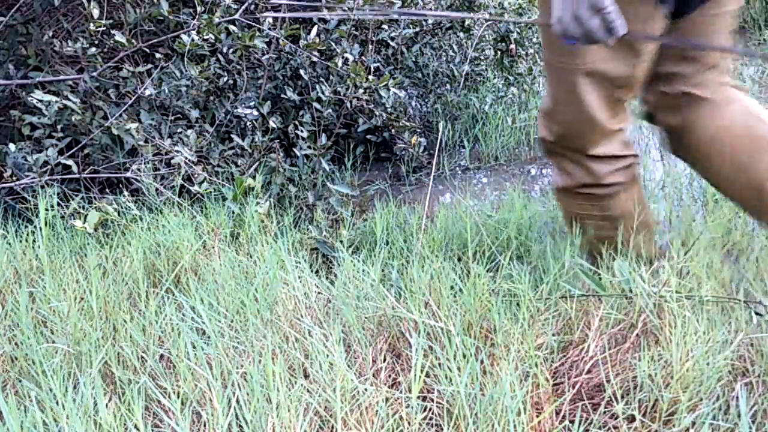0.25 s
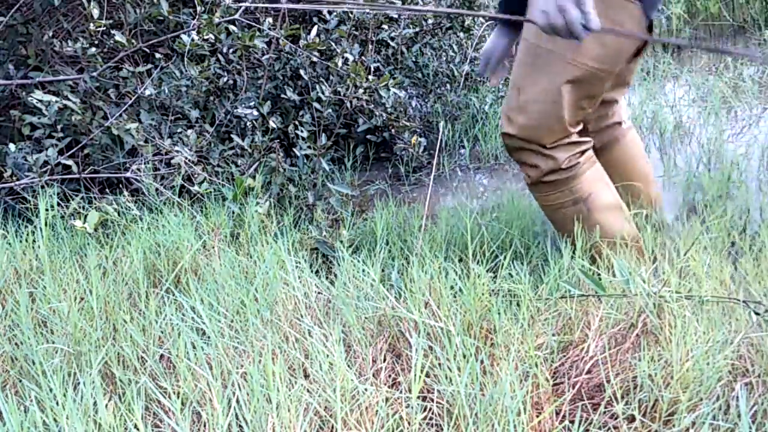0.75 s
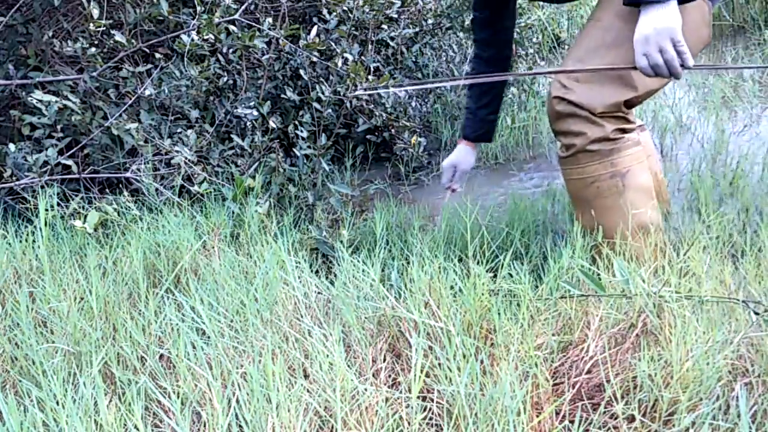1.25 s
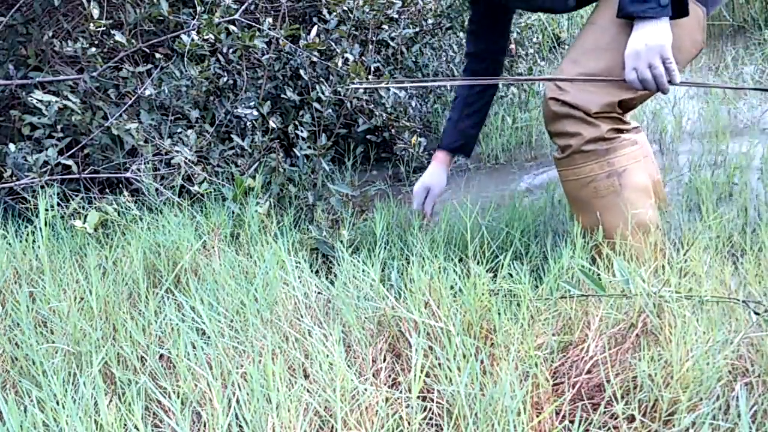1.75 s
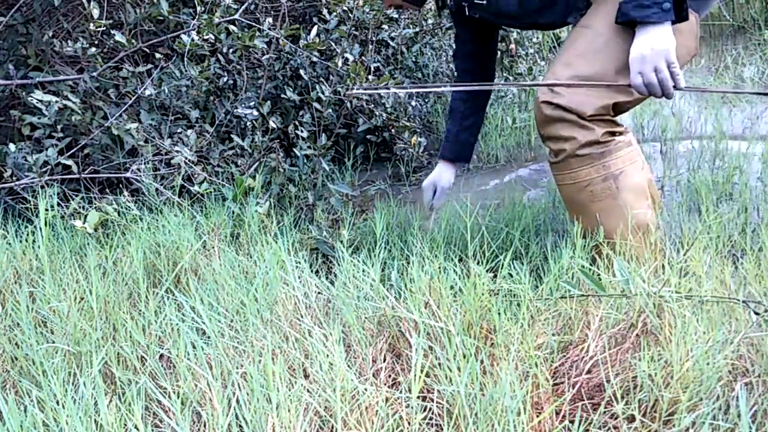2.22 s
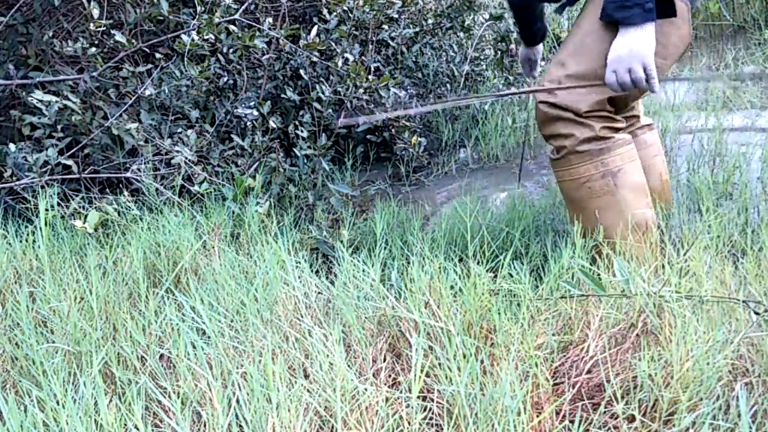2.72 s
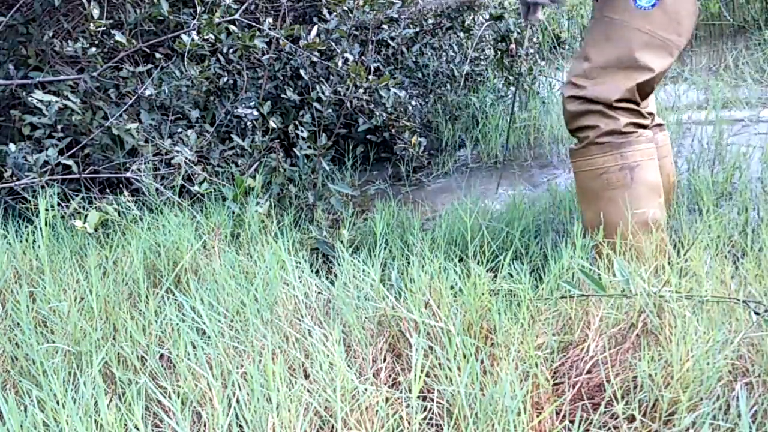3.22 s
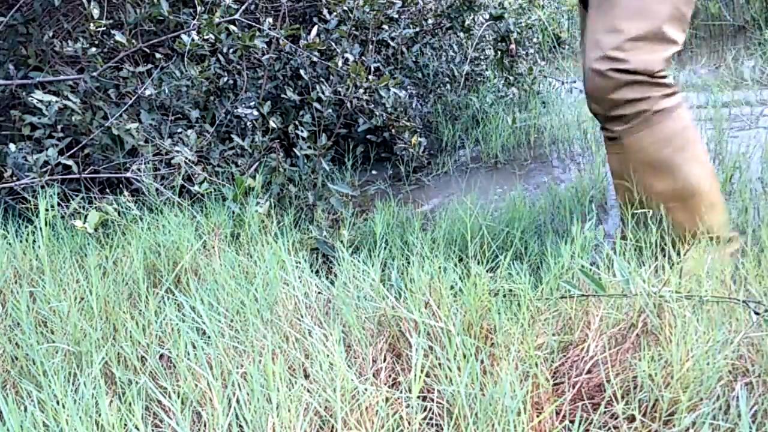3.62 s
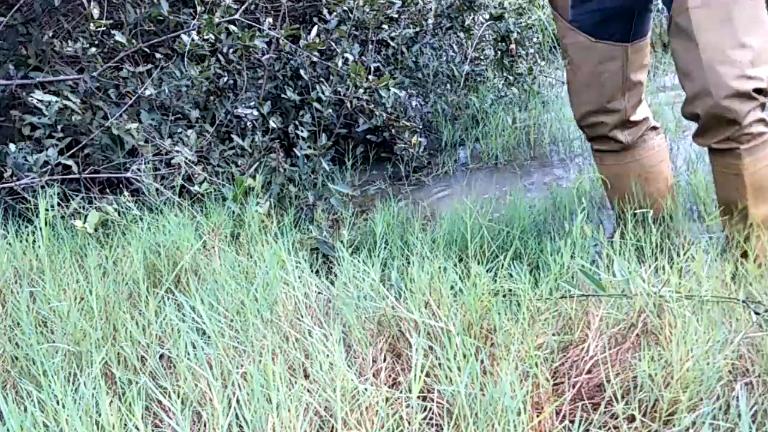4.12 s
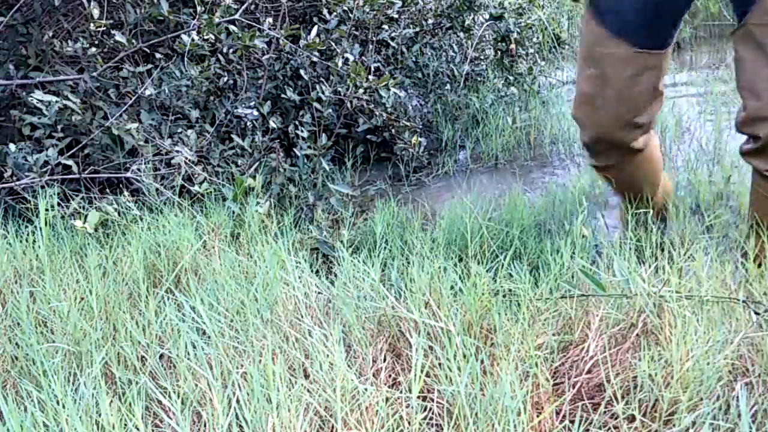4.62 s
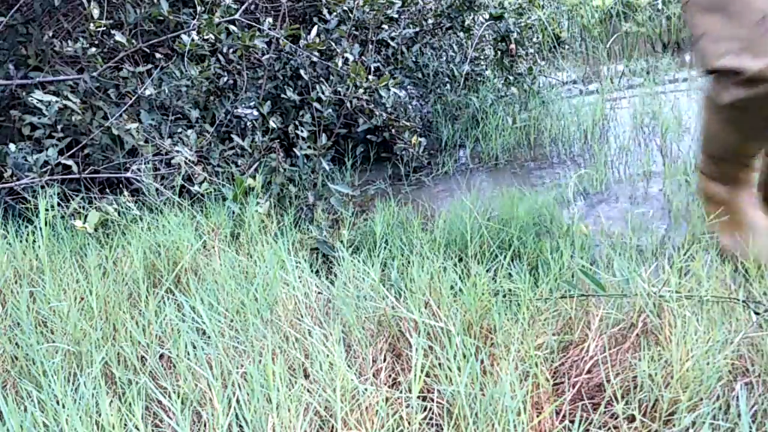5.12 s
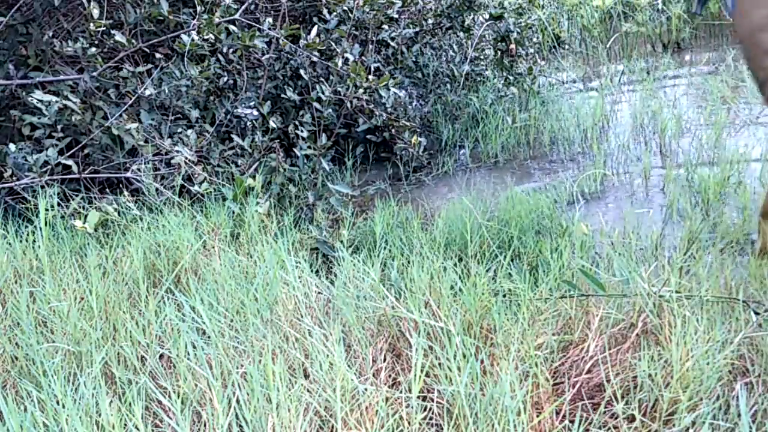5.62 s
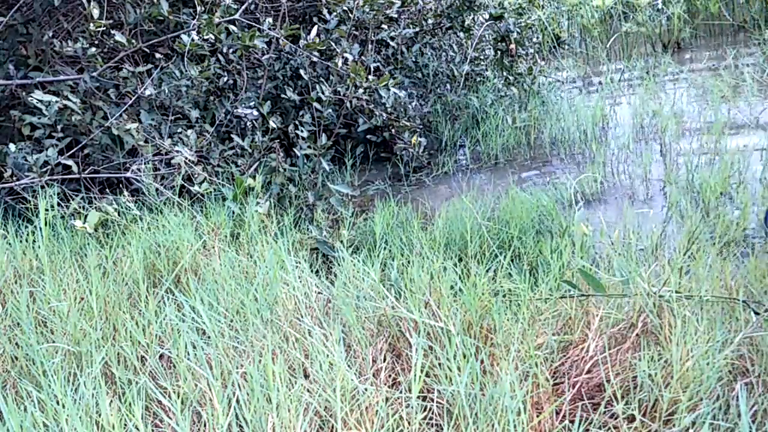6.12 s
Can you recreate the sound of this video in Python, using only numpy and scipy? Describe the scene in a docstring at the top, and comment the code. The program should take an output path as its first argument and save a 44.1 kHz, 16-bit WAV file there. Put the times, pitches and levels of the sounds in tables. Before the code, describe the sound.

Someone wades along a grassy pond edge, sloshing, dripping and snapping stems, over a faint bird, crickets and a low far-off rumble.

```python
"""Wet grass swishes and stems snap as someone in rubber waders steps along a pond edge, right of centre.
Blades slide on rubber, the shallows slosh and froth, and drops pat on the surface and plop as bubbles
ring with a rising pitch. Behind the steps a small bird repeats falling notes, two crickets trill with
their wings, and distant traffic lays a low rumble under it all."""
import sys
import numpy as np
from scipy import signal
from scipy.fft import rfft, irfft, next_fast_len
from scipy.io import wavfile

SR = 44100
rng = np.random.default_rng(int(sys.argv[2]) if len(sys.argv) > 2 else 0)


def pcm_store(signal):
    """Save signal as 16-bit PCM."""
    levels = np.round(np.clip(np.atleast_2d(signal), -1, 1) * 32767)
    wavfile.write(sys.argv[1], SR, levels.astype(np.int16).T)


N = 280299
T = np.arange(N) / SR

# water and grass stirring between sweeps: (time [s], slosh [dB], rustle [dB], spray [dB], froth [dB])
STIR = [(0, -55.5, -63.5, -65.5, -65.5), (.42, -57.5, -54, -68.5, -63), (.59, -62.5, -64.5, -80, -63),
        (.7, -57.5, -58, -85, -56), (.95, -61.5, -59, -81, -67), (1.22, -64.5, -62, -75.5, -68),
        (1.32, -71, -68, -83, -91), (1.8, -70.5, -79, -88, -78), (2.6, -78.5, -104, -113, -85),
        (2.85, -70, -72.5, -86.5, -72.5), (3.12, -73, -65, -99, -61), (3.42, -68.5, -72, -110, -83),
        (3.85, -65.5, -63, -104, -69.5), (4.1, -72, -67.5, -99, -67), (4.35, -79, -81, -116, -105),
        (4.75, -76, -80, -116, -80), (4.82, -61.5, -62, -96, -82), (5.0, -60, -61, -88, -73),
        (5.2, -70, -63, -83.5, -79), (5.5, -56.5, -63.5, -67, -69), (5.78, -65, -70.5, -79.5, -73),
        (5.92, -64.5, -76, -92, -73.5), (6.36, -65.5, -76, -105, -68.5)]
# boot sweeps through wet grass: (start [s], rise [s], hold [s], rustle [dB], spray [dB], froth [dB])
SWEEPS = [(0.075, 0.014, 0.052, -49, -62, -73), (0.167, 0.048, 0.026, -55, -85, -56.5),
          (0.296, 0.0096, 0.03, -43, -64, -46.5), (0.612, 0.0096, 0.044, -47.5, -62, -62),
          (0.685, 0.015, 0.014, -51.5, -61, -53), (0.744, 0.013, 0.0063, -45.5, -63, -66),
          (0.835, 0.0081, 0.0059, -45.5, -54.5, -81), (0.863, 0.01, 0.01, -74, -90, -88),
          (2.624, 0.072, 0.068, -61, -81.5, -66), (3.82, 0.042, 0.09, -69, -76, -75),
          (4.776, 0.021, 0.11, -57, -94, -48.5), (4.924, 0.032, 0.08, -57.5, -68, -46),
          (5.018, 0.05, 0.049, -53.5, -62.5, -65), (5.519, 0.06, 0.044, -51.5, -64, -82)]
RUSTLE, SPRAY, FROTH = range(3)   # the layers of a sweep
# tone of pushed water, sliding blades, fine spray and far air: (frequency [Hz], relative level [dB])
SLOSH_SPECTRUM = [(88, -35), (150, 8), (200, -4), (371, -3), (833, -7.5), (1500, -18.5), (1950, -44),
                  (3300, -120)]
RUSTLE_SPECTRUM = [(590, -5.5), (1000, -13), (1420, 0.5), (1640, 3.5), (3660, 9), (5260, -9.5), (7500, -34),
                   (9750, -51), (16500, -120)]
SPRAY_SPECTRUM = [(3820, -6), (6500, -5), (8550, -12), (9720, -15), (12500, -18), (13800, -14.5),
                  (15600, -17.5)]
AIR_SPECTRUM = [(15, -26), (40, -6.5), (100, -4.5), (170, -5.5), (300, -18), (800, -23), (2500, -26),
                (3200, -25.5), (3500, -57), (3900, -19.5), (4600, -37), (5100, -71), (8000, -73),
                (16000, -105)]
# how much later the steps reach the left channel: (time [s], lag [microseconds])
WALKER_LAG = [(0, 149), (1.3, 146), (2.5, 54), (4.3, 152), (4.7, 142), (5.2, 131), (5.45, 246), (6.36, 243)]
# stereo likeness of the far bed: (frequency [Hz], left-right correlation [0-1])
FAR_LIKENESS = [(30, 0.73), (100, 1), (300, 0.28), (600, 0.063), (3000, 0.062)]
# level ride of the rumble: (time [s], relative level [dB])
RUMBLE_RIDE = [(0.0, -61), (0.21, -55), (4.07, -57.5), (4.74, -62.5), (4.83, -58), (6.36, -56)]
# noise bands of the rumble: (centre [Hz], width [Hz], relative level [dB])
RUMBLE_BANDS = [(81.7, 46, -3.5), (102.1, 9.3, -1.5), (120.4, 28.5, -1.5), (140.5, 37, -12)]
# bird phrases: (middle of first note [s], notes [count], first note [dB], later notes [dB])
BIRD_PHRASES = [(0.041, 1, -59.5, -64), (.43, 1, -58, -61), (1.19, 2, -59.5, -60), (1.519, 3, -66.5, -58),
                (1.808, 2, -72, -72), (2.216, 3, -61, -61), (2.84, 1, -58, -57), (3.191, 2, -59, -58.5),
                (3.508, 3, -69, -59), (3.976, 2, -60.5, -59.5), (4.295, 3, -67, -61),
                (5.391, 2, -60.5, -59.5), (5.792, 1, -73, -70), (5.964, 3, -60, -59.5)]
# the fall of each bird note: (start pitch [Hz], end pitch [Hz], length [s])
BIRD_GLIDE = (3220, 2740, 0.039)
# longer far notes: (middle [s], level [dB], start pitch [Hz], end pitch [Hz], length [s])
FAR_WHISTLES = [(3.544, -67.5, 1890, 1888, 0.21), (5.29, -69, 2220, 2160, 0.13),
                (6.197, -68.5, 2630, 1774, 0.18)]
# stems breaking under a boot, and near 5.6 s a few sharp clicks of drops hitting the water: (time [s], relative
# crack level [dB], relative thud level [dB], pitch [Hz])
SNAPS = [(0.0956, -36.5, -47, 1030), (0.2733, -36.5, -40, 1000), (0.3162, -37, -33, 1610),
         (0.6199, -32, -60, 2470), (0.6962, -39, -39.5, 1500), (0.703, -39, -44, 1220),
         (0.711, -49, -45, 2300), (0.727, -31.5, -56, 1820), (0.7572, -26, -31.5, 1550),
         (0.845, -16, -35.5, 1184), (1.2075, -55, -52.5, 1800), (5.588, -40.5, -57, 3280),
         (5.6164, -44, -69, 3650), (5.632, -36.5, -66, 3000)]
# flying droplets: (time [s], relative level [dB], pitch [Hz])
DROPLET_TICKS = [(0.302, -45, 4170), (.319, -32, 2680), (.333, -42, 3600), (0.4736, -42, 4330),
                 (.594, -45, 3020), (.626, -46, 5040), (.6335, -34, 4100), (.698, -35, 4200),
                 (0.708, -48.5, 6400), (0.755, -43.5, 5500), (.764, -47, 5600), (0.85, -46.5, 5550),
                 (0.855, -60, 7450), (1.619, -48, 6450), (4.2766, -49, 3870), (4.817, -35.5, 3800)]
# drops and air pockets closing: (time [s], relative level [dB], nominal pitch [Hz], 60 dB decay [s])
PLOPS = [(0.197, -39, 1300, 0.024), (0.308, -40.5, 1520, 0.052), (0.347, -36, 1610, 0.01),
         (0.364, -46.5, 943, 0.053), (0.461, -41, 1285, 0.024), (0.51, -50.5, 1940, 0.023),
         (.527, -53, 706, 0.064), (0.366, -45, 2390, .03), (0.5738, -37, 2530, 0.021),
         (.575, -41, 1930, 0.022), (0.6338, -24.5, 2650, 0.0057), (0.7, -34.5, 1150, 0.036),
         (0.751, -24, 2050, 0.0095), (0.8776, -30.5, 1740, 0.012), (0.9485, -40.5, 2690, 0.035),
         (0.968, -41, 1810, 0.021), (0.996, -44, 2070, 0.032), (1.1773, -40.5, 1745, 0.023),
         (2.6457, -42.5, 1740, 0.017), (2.671, -36, 755, 0.016), (2.722, -45.5, 2470, 0.028),
         (2.726, -46, 1730, 0.025), (2.753, -42, 2770, 0.043), (2.768, -48, 2240, 0.037),
         (2.9, -42.5, 1640, 0.037), (2.899, -44.5, 1062, 0.049), (2.985, -53, 1500, .02),
         (3.014, -48, 1830, .02), (3.06, -42, 1520, 0.022), (3.091, -50.5, 1550, 0.041),
         (3.11, -54, 2580, 0.03), (3.118, -48.5, 3220, 0.03), (3.129, -47, 880, 0.017),
         (3.132, -48.5, 1630, 0.032), (3.1389, -40.5, 1810, 0.014), (3.219, -47, 1200, 0.024),
         (3.293, -38.5, 1044, 0.036), (3.394, -52, 1915, 0.023), (3.7947, -39.5, 1290, 0.016),
         (3.82, -59, 2050, 0.018), (3.837, -54, 1700, 0.016), (3.85, -51, 1700, 0.033),
         (3.907, -50, 2160, 0.021), (4, -52, 1530, 0.02), (4.021, -47.5, 800, 0.036),
         (4.035, -51, 1420, 0.018), (4.152, -54, 1520, 0.019), (4.075, -41, 792, 0.024),
         (4.277, -52.5, 1760, 0.025), (4.403, -58, 1745, 0.035), (4.774, -38.5, 1930, 0.024),
         (4.796, -28.5, 1755, 0.021), (4.803, -39, 785, 0.023), (4.847, -39, 1046, .03),
         (4.852, -27, 678, 0.032), (4.9435, -36, 740, 0.026), (4.974, -35.5, 1720, 0.029),
         (4.978, -34.5, 1093, 0.045), (5.001, -24.5, 1840, 0.014), (5.027, -37, 1320, 0.022),
         (5.0623, -35.5, 1290, 0.019), (5.0883, -48, 2900, 0.014), (5.108, -48, 1360, 0.019),
         (5.255, -50, 1250, 0.018), (5.3217, -51.5, 1750, 0.027), (6.231, -52, 706, 0.026),
         (6.268, -48, 1390, 0.016), (6.332, -38.5, 833, 0.027)]
# water closing over a boot: (time [s], level [dB], start pitch [Hz], 60 dB decay [s], pitch climb [1/s])
GURGLES = [(.97, -51.5, 904, 0.28, 6), (1.04, -52, 506, 0.21, 8.5), (2.68, -49, 671, 0.12, 1.5),
           (2.728, -38, 806, 0.11, 40.5), (2.742, -46, 680, 0.081, 15.5), (2.832, -51, 950, 0.05, 53),
           (2.932, -55, 895, 0.08, 3.5), (3.015, -49, 944, 0.12, 2), (3.885, -29.5, 1075, 0.044, 41.5),
           (3.89, -46.5, 582, 0.13, 3.5), (4.076, -42.5, 1060, 0.043, 23), (4.295, -54.5, 1090, 0.14, -2),
           (4.868, -37, 745, 0.2, 5.5), (4.875, -34, 894, 0.12, 6), (4.94, -42, 410, 0.29, 9.5),
           (4.955, -42, 815, 0.068, 6), (4.996, -36, 501, 0.2, 9), (5.03, -34, 1213, 0.059, 7),
           (6.335, -44, 843, 0.15, 4.5)]
# pace of the near cricket: (time [s], trills so far [count])
CRICKET_PACE = [(.74, 0), (2.198, 6), (3.42, 11), (4.181, 14), (6.335, 23)]
# level ride of the near cricket: (time [s], level [dB])
CRICKET_RIDE = [(.7, -66), (1.7, -66.5), (2.2, -71.5), (2.7, -65.5), (4.2, -66), (4.5, -75), (4.9, -71),
                (5.6, -68.5), (6.3, -72)]
# trills of a higher, farther cricket: (time [s])
HIGH_TRILLS = [1.28, 1.58, 1.9, 2.21, 2.68, 3.0, 3.32, 3.75, 4.16, 4.47]
# drops striking the surface: (time [s], level [dB], pitch [Hz])
PATS = [(2.746, -30, 2400), (2.8987, -29.5, 1590), (3.0148, -48, 2100), (3.048, -33, 2000),
        (3.1356, -37, 2500), (3.1403, -38, 1900), (3.797, -39.5, 1800), (4.7742, -39, 2500),
        (4.888, -24, 2700), (4.9662, -22.5, 2500), (5.002, -30, 2590), (5.027, -29, 2200),
        (5.063, -25, 2000), (5.1118, -33, 2000)]


def amp(db):
    """Decibels to gain."""
    return 10 ** (np.asarray(db) / 20)


def rms_one(x):
    """Scale to unit rms."""
    return x / np.sqrt(np.mean(x ** 2) + 1e-20)


def at_hz(points, hz):
    """Read a curve on a log-frequency axis."""
    knots_hz, values = np.transpose(points)
    return np.interp(np.log(hz + 1), np.log(knots_hz), values)


def colour(x, spectrum):
    """Equalise to a spectrum, at unit rms."""
    size = next_fast_len(N)
    gain = amp(at_hz(spectrum, np.arange(size // 2 + 1) * SR / size))
    return rms_one(irfft(rfft(x, size) * gain, size)[..., :N])


def band(x, low_hz, high_hz):
    """Band-pass, at unit rms."""
    return rms_one(signal.sosfilt(signal.butter(2, [low_hz, high_hz], "band", fs=SR, output="sos"), x))


def drift(rate_hz):
    """A random wander, at unit rms."""
    knots = np.arange(0, T[-1] + 1, .5 / rate_hz)
    return rms_one(np.interp(T, knots, rng.standard_normal(len(knots))))


def add(out, s, sound):
    """Mix a short sound in at time s."""
    i = max(round(s * SR), 0)
    out[i:i + len(sound)] += sound[:N - i]


def place(x, lag_us, pan_db):
    """Pan by delaying the left channel and tilting the levels; positive pan is left."""
    fine = signal.resample_poly(x, 4, 1)
    late = np.interp(4 * (T - lag_us * 1e-6) * SR, np.arange(4 * N), fine)
    return np.array([late, x]) * amp([[pan_db / 2], [-pan_db / 2]])


def grains(per_s, spread_db, smooth):
    """Uneven tiny clicks over smooth noise."""
    sizes = amp(spread_db * np.minimum(rng.exponential(1, N), 5)) * rng.choice([-1, 1], N)
    return rms_one(sizes * (rng.random(N) < per_s / SR)) + smooth * rng.standard_normal(N)


def boot_envelope(layer, fade_db_per_s):
    """Gain of one layer: the slow stir plus the rise, hold and fade of each sweep."""
    times, _, *stir_db = np.transpose(STIR)
    out, t = amp(np.interp(T, times, stir_db[layer])), np.arange(SR // 2) / SR
    for s, rise_s, hold_s, *db in SWEEPS:
        fade_db = fade_db_per_s * np.maximum(t - rise_s - hold_s, 0)
        add(out, s, np.minimum(t / rise_s, 1) ** 2 * amp(db[layer] - fade_db))
    return out


def bubble(t, hz, t60, climb, rise_s, wobble=0):
    """A dying sine whose pitch climbs as the bubble nears the surface; wobble shakes its level."""
    envelope = amp(-60 * t / t60) * (1 - np.exp(-t / rise_s)) * (1 + wobble)
    return envelope * np.sin(2 * np.pi * hz * (t + climb * t * t / 2))


def wading():
    """Boots push water aside and blades slide on rubber: wide stereo grass and a mono wake."""
    slosh = colour(grains(300, spread_db=2.5, smooth=1.04), SLOSH_SPECTRUM)
    rustle = colour(grains(1600, spread_db=5.5, smooth=0.84), RUSTLE_SPECTRUM)
    sweep = boot_envelope(RUSTLE, fade_db_per_s=302) * amp(2.8 * drift(35))
    wide_grass = amp(-6) * sweep * np.array([np.roll(rustle, N // 3), np.roll(rustle, -N // 3)])
    push = amp(np.interp(T, *np.transpose(STIR)[:2]) + 1.7 * drift(25))
    return wide_grass, push * slosh + sweep * rustle + froth()


def froth():
    """Swarms of small bubbles ring in the wake at random moments and pitches."""
    out, t = np.zeros(N), np.arange(int(.04 * SR)) / SR
    for when, pitch, strength in rng.random((2200, 3)):
        hz = 800 * 5.5 ** pitch
        ring = bubble(t, hz, t60=18 / hz, climb=hz / 80, rise_s=.0015)
        add(out, when * N / SR, amp(13 * strength) * ring)
    return boot_envelope(FROTH, fade_db_per_s=257) * rms_one(out)


def spray():
    """Fine wet hiss spread wide over the grass, nearer on the right."""
    fizz = grains(700, spread_db=2.6, smooth=.3) + 1.5 * rng.standard_normal((2, N))
    envelope = boot_envelope(SPRAY, fade_db_per_s=294) * amp(2 * drift(30))
    return envelope * colour(fizz, SPRAY_SPECTRUM) * amp([[-2.5], [2.5]])


def bank_echo(x):
    """Faint dull echoes off the water and bushes, timed differently on each side."""
    dull = amp(-17.5) * signal.lfilter([.4], [1, -.6], x)
    return np.array([sum(np.roll(dull, int(delay * SR)) * (T > delay) for delay in delays_s)
                     for delays_s in [(.0037, .009, .017), (.0051, .012, .021)]])


def far_bed():
    """Diffuse air and distant traffic, centred only in the bass, with a lumpy rumble near 100 Hz."""
    size = next_fast_len(N)
    alike = at_hz(FAR_LIKENESS, np.arange(size // 2 + 1) * SR / size)
    mid, side = rfft(rng.standard_normal((2, size))) * np.sqrt([1 + alike, 1 - alike])
    pair = irfft([mid + side, mid - side], size)[:, :N]
    rumble = sum(amp(db) * band(pair, hz - width / 2, hz + width / 2) for hz, width, db in RUMBLE_BANDS)
    air = amp(-61 + 0.93 * drift(0.98)) * colour(pair, AIR_SPECTRUM)
    return air + amp(np.interp(T, *np.transpose(RUMBLE_RIDE)) - 2.5) * rms_one(rumble)


def insect_buzz():
    """A very faint, thin insect buzz that never pauses."""
    return amp(-105 + 2.5 * drift(3.6)) * band(rng.standard_normal(N), 6690, 6990)


def birdsong(note_gap_s=.0765):
    """Runs of falling notes and a few far whistles, roughened by leaves and distance."""
    notes = [(s + k * note_gap_s, later_db if k else first_db, *BIRD_GLIDE)
             for s, count, first_db, later_db in BIRD_PHRASES for k in range(count)]
    out = np.zeros(N)
    for s, db, start_hz, end_hz, length_s in notes + FAR_WHISTLES:
        glide_hz = np.linspace(start_hz, end_hz, int(length_s * SR))
        tone = np.sin(2 * np.pi * np.cumsum(glide_hz) / SR)
        add(out, s - length_s / 2, amp(db) * np.sqrt(np.hanning(len(tone))) * tone)
    out += .18 * np.roll(out, int(.034 * SR))   # slap off the far bank
    return out * (1 + .3 * drift(120))


def snaps_and_ticks():
    """Stems crack over the low thud of the boot, drops click sharply on the water, and flying droplets add
    bright ticks."""
    out, t = np.zeros(N), np.arange(int(0.034 * SR)) / SR
    attack = (1 - np.exp(-t / 0.00036)) ** 2
    for s, db, thud_db, hz in SNAPS:
        splinter = band(rng.standard_normal(len(t)), hz * 0.5, 4300)
        crack = np.sin(2 * np.pi * hz * t) + hz / 3300 * splinter
        add(out, s, amp(db + 6.5) * attack * crack * np.exp(-t / 0.0013))
        add(out, s, amp(thud_db + 13) * attack * np.sin(2 * np.pi * 360 * t) * np.exp(-t / 0.0017))
    out = signal.sosfilt(signal.butter(4, 3900, fs=SR, output="sos"), out + 1e-18)   # soggy, so dull
    for s, db, hz in DROPLET_TICKS:
        tick = band(rng.standard_normal(len(t)), hz * 0.91, hz * 1.05)
        add(out, s, amp(db + 4.5) * tick * attack * np.exp(-t / 0.0023))
    return out


def plops_and_gurgles():
    """Drops splash, then ring as bubbles, the short ones climbing fastest; gurgles ring on unevenly."""
    out, t = np.zeros(N), np.arange(int(.2 * SR)) / SR
    for s, db, hz, t60 in PLOPS:
        noise = rng.standard_normal(len(t))
        splash = band(noise, hz * 0.95, hz * 1.75) * (1 - np.exp(-t / 0.00058)) * np.exp(-t / 0.0028)
        ring = bubble(t, hz * 0.9825, t60, 0.13 / t60, rise_s=0.0017, wobble=0.4 * band(noise, 40, 220))
        add(out, s, amp(db + 7.5) * (ring + 0.26 * splash))
    for s, db, hz, t60, climb in GURGLES:
        wobble = 0.4 * band(rng.standard_normal(len(t)), 34, 140)
        add(out, s, amp(db) * bubble(t, hz, t60, climb, rise_s=0.0027, wobble=wobble))
    return signal.sosfilt(signal.butter(6, 5200, fs=SR, output="sos"), out)   # round off the edges


def near_trills():
    """Time and level of each of the near cricket's trills."""
    due, sung = np.transpose(CRICKET_PACE)
    times = np.interp(np.arange(sung[-1] + 1), sung, due)
    return zip(times, np.interp(times, *np.transpose(CRICKET_RIDE)))


def cricket(trills, length_s, hz, width_hz, depth, strokes_per_s=40.3):
    """Runs of wing strokes, strongest early, on a narrow wing resonance smeared by the grass."""
    swell, t = np.zeros(N), np.arange(int(length_s * SR)) / SR
    strokes = 1 - depth * np.cos(2 * np.pi * strokes_per_s * t)
    trill = strokes * (1 - np.exp(-t / 0.02)) * np.cos(np.pi / 2 * t / length_s)
    for s, db in trills:
        add(swell, s - length_s / 3, amp(db) * trill)
    smear = band(rng.standard_normal(N), hz - width_hz / 2, hz + width_hz / 2)
    return swell * (smear + 0.5 * np.sin(2 * np.pi * hz * T + 3.34 * drift(12)))


def pats():
    """A drop's first hard contact with the surface: a rounded click, over within three cycles."""
    out, t = np.zeros(N), np.arange(SR // 200) / SR
    for s, db, hz in PATS:
        add(out, s, amp(db) * np.sin(2 * np.pi * hz * t) * np.exp(-((hz * t - 1) / 0.6) ** 2))
    return out


def scene():
    """The mix: walker on the right, insects and bird around, the far bed underneath."""
    water = plops_and_gurgles()
    wide_grass, wake = wading()
    steps = wake + snaps_and_ticks() + water + pats()
    lag_us = np.interp(T, *np.transpose(WALKER_LAG))
    walker = place(steps, lag_us, pan_db=-1) + bank_echo(steps) + spray() + wide_grass
    near = cricket(near_trills(), length_s=0.191, hz=4210, width_hz=246, depth=0.23)
    high = cricket([(s, -80.5) for s in HIGH_TRILLS], length_s=0.23, hz=5570, width_hz=380, depth=0.4)
    crickets = place(near, lag_us=4, pan_db=8.5) + place(high, lag_us=54, pan_db=1.5)
    buzz = place(insect_buzz(), lag_us=27, pan_db=-31)
    bird = place(birdsong(), lag_us=10, pan_db=2.5)
    return walker + crickets + buzz + bird + far_bed()


def record(dry, cutoff_hz=15720):
    """A steep high cut on the whole mix."""
    return signal.sosfilt(signal.ellip(12, .5, 70, cutoff_hz, fs=SR, output="sos"), dry)


dry = scene()
out = record(dry)
pcm_store(out)
```